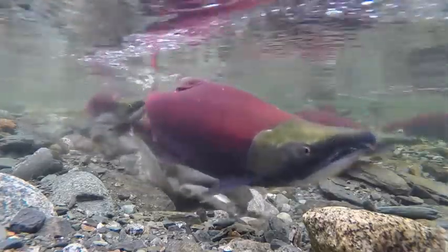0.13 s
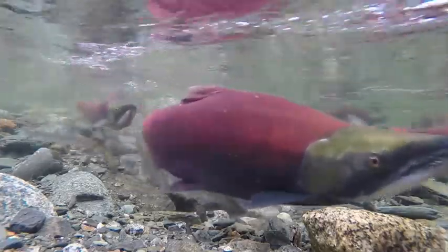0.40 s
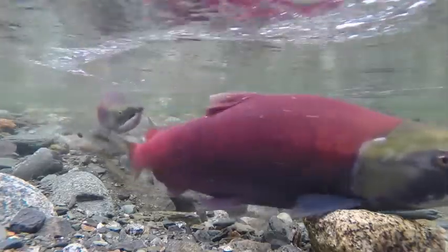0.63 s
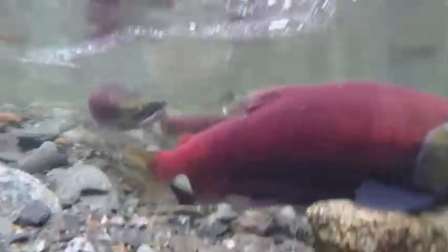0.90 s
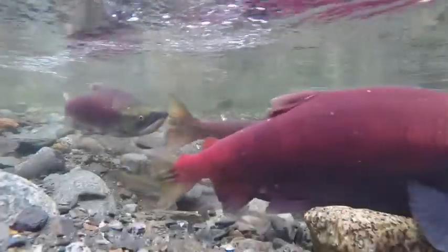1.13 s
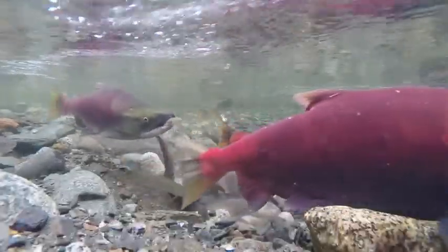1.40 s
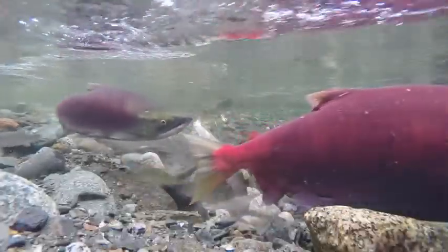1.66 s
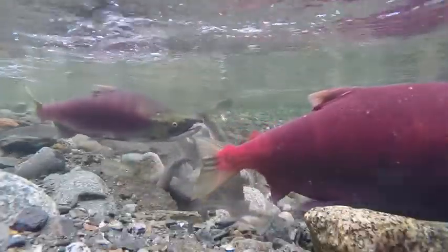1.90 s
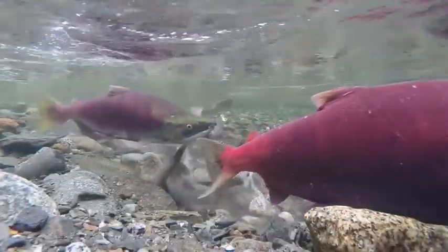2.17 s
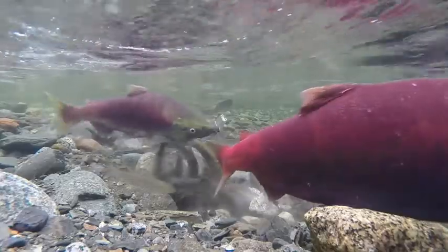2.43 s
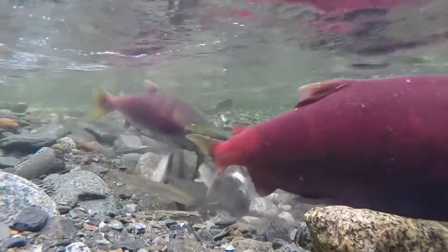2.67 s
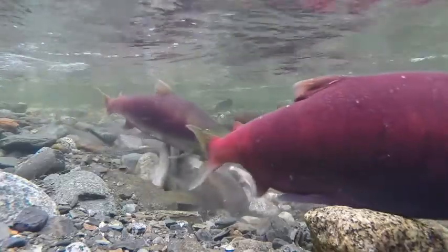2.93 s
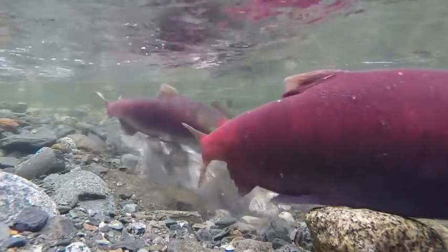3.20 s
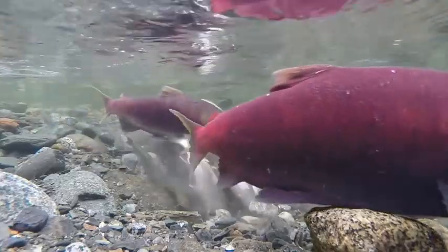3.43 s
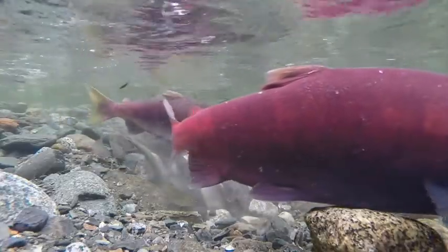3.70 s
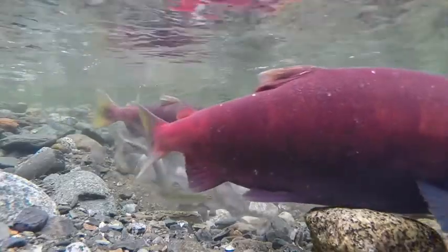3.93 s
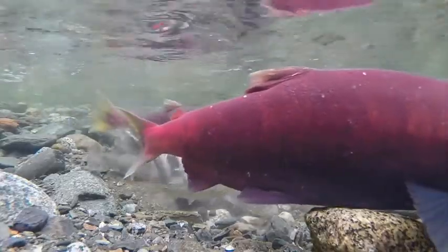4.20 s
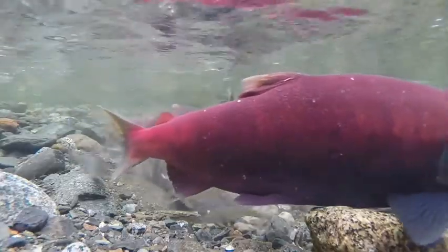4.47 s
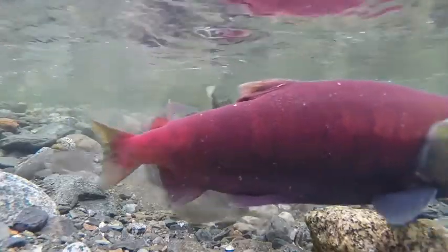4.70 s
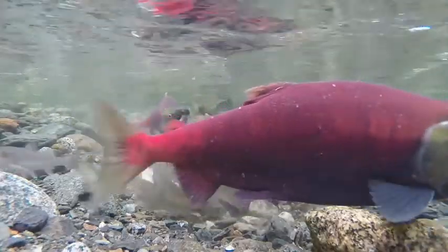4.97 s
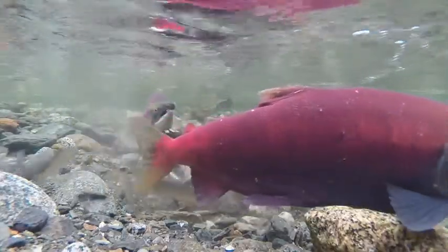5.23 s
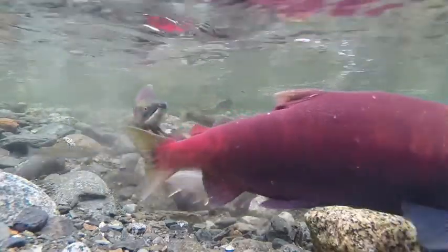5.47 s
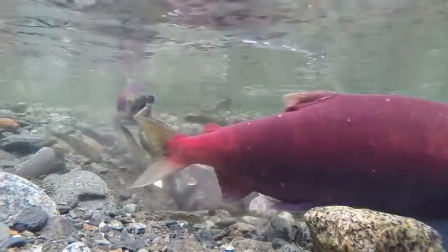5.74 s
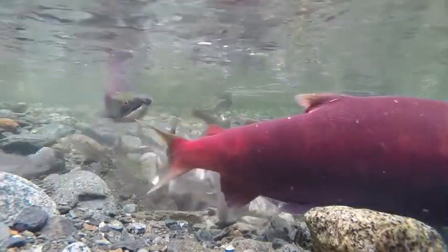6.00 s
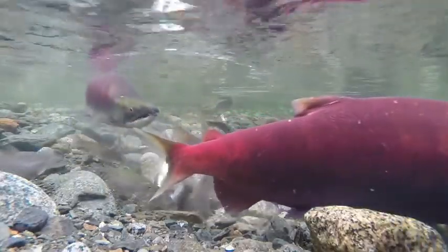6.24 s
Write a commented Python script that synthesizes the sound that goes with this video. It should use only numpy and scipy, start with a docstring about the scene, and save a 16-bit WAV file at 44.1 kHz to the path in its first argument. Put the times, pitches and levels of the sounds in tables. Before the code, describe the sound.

Faint underwater stream rumble and hiss, then a violent cluster of fish thumps with bubbles, followed by a rattle of gravel ticks and quiet.

```python
"""Low surges of water and a hiss, heard from inside a small sealed housing in a shallow gravel stream.
The surges are short swelling tones over a low rumble; the hiss is shaped noise, with a thin whistle in it.
Gravel ticks are noise knocks that make the shell ring. Then a fish knocks: pushes rock the housing, rough
noise hums in its body and hisses as spray, and bubbles are sliding tones that die away.
The gain control turns the sound down on the loud blows and brings it back slowly."""
import sys
import numpy as np
from scipy import signal
from scipy.fft import rfft, irfft
from scipy.io import wavfile
from scipy.ndimage import uniform_filter1d

SR = 44100
rng = np.random.default_rng(int(sys.argv[2]) if len(sys.argv) > 2 else 0)


def attenuation_scalar(level_db):
    """Turn a level in dB into a linear amplitude multiplier (20 dB per decade)."""
    decades = np.asarray(level_db, float) / 20
    return 10 ** decades


def generate_wav(signal):
    """Clip the signal to [-1, 1] and save it as 16-bit WAV at the path in sys.argv[1]."""
    frames = np.transpose(np.atleast_2d(signal))
    scaled = np.clip(frames, -1, 1) * 32767
    pcm = np.round(scaled).astype(np.int16)
    wavfile.write(sys.argv[1], SR, pcm)


N = 280917  # samples

# The strongest eddies that rock the housing: middle_s, peak_db, pitch_hz, half_length_ms
SURGES = [(.089, -38, 68.6, 17), (.126, -45.5, 62, 120), (.35, -42.5, 38, 13), (1.03, -30.5, 38, 48),
          (1.124, -40, 35.3, 27), (1.348, -44, 60, 13), (1.512, -40.5, 59, 6), (1.897, -39, 59, 18),
          (1.991, -35, 62.6, 17), (2.21, -43, 68.6, 13), (2.301, -42.5, 62.4, 60), (2.453, -37.5, 78.5, 11),
          (2.553, -45, 76, 13), (2.643, -33.5, 69.5, 12), (2.936, -44.5, 64, 28), (3.051, -42.5, 75, 14),
          (3.209, -41, 62, 15), (3.256, -41.5, 63.4, 9.7), (3.428, -34, 55, 18), (3.566, -42, 61, 32),
          (3.658, -44, 57.7, 28), (3.771, -40.5, 55.6, 13), (4.378, -48, 65, 15), (4.529, -39.5, 62, 17),
          (4.826, -44.5, 68.5, 10), (5.153, -44.5, 67, 18), (5.415, -39.5, 63.6, 11), (5.576, -43, 71, 34),
          (5.726, -43, 69, 12), (5.869, -41.5, 62, 57), (6.093, -41, 71, 17), (6.347, -43, 80, 19)]
# The unbroken rumble under the eddies: time_s, level_db
RUMBLE = [(0, -55), (.25, -53), (.46, -69), (.58, -50), (.95, -40), (1.06, -53.5), (1.58, -57.5),
          (2.04, -51), (2.77, -59.5), (3.62, -54.5), (3.94, -61), (4.58, -58), (5.46, -54.5), (6.37, -56)]
RUMBLE_HZ, RUMBLE_WIDTH_HZ = 62, 45
# Small eddies in between: how many per second, peak above the rumble
EDDIES_PER_S, EDDY_ABOVE_DB = 7, 9.5
# Their middle pitch, its spread either way as a share, and their average half-length
EDDY_HZ, EDDY_SPREAD, EDDY_MS = 65.4, .12, 12.4

# Colour of the stream's hiss: pitch_hz, relative_level_db (per Hz)
HISS_COLOUR = [(59, -12), (100, -6), (140, -4.5), (627, -11.5), (936, -15.5), (2630, -19.5), (3930, -23.5),
               (4960, -24), (6120, -28.5), (7250, -29.5), (9150, -34.5), (10400, -33.5), (14500, -42.5),
               (15500, -33)]
HISS_DB = -59.5
# A thin steady whistle: pitch_hz, width_hz, level_db
WHISTLE = (5050, 100, -78.5)

# The clearest gravel ticks: start_s, level_db, low_modes_db, top_modes_db, chatter_ms
TICKS = [(.2144, -59, -8.5, -30, 1.9), (.4157, -51, -6, 16, 1.7), (.426, -48, -1, 30, .77),
         (1.797, -54, 11, -8, 2.6), (1.8481, -48.5, 2, 0, 1.2), (1.8874, -49, 6, 13, 3.4),
         (1.9007, -46.5, -13, 12, 4.1), (1.925, -45, -17, 2, 1.4), (2.0331, -44.5, -12, -20, 0.6),
         (2.0507, -43.5, 10, -9, 0.57), (2.0705, -46, 7, -22, 2.1), (2.1017, -35.5, -0.5, -2, 2.3),
         (2.125, -46, 11, -20, .48), (2.1358, -44, -1, -5.5, 1.2), (2.1579, -38.5, -11, -9, 0.97),
         (2.1716, -35.5, 2.5, -1, 2), (2.178, -43, -17, -11, 3), (2.1962, -39, -1, -14, 2.7),
         (2.2124, -49, 1, -8, 2.8), (2.2381, -41.5, 1, -2, 1.3), (2.258, -45, 10, -2, 1),
         (2.2651, -46, 7.5, 10, 2.2), (2.2747, -45, -6, -19, 1.2), (2.3186, -39, 4, 8, 2.8),
         (2.3292, -44.5, 10, 2, 4), (2.3404, -38.5, -10, -14, 3.3), (2.3715, -44, 5, 0.5, 2.5),
         (2.4338, -40.5, -15, 2, .45), (2.468, -47.5, -3, 0, 1.1), (2.506, -51, 2, -9, 1.7),
         (2.5141, -44.5, 6, -15, .37), (2.5466, -47.5, -2, 17, 1.1), (2.6394, -42.5, -3, -13, 1.1),
         (2.7333, -55.5, -9, 20, .84), (2.868, -51.5, 6, 15, 0.72), (3.0781, -52, -8, -7, 2.1),
         (3.112, -50, -1, 3, 1.1), (3.156, -55, -6, 11, 2.2), (3.3689, -53, 18, -10, 1.6),
         (4.2363, -56.5, -13, 5, 3.2), (4.3674, -47, -8, 12, 1.9), (4.82, -47.5, 4, -13, 0.52),
         (4.897, -51.5, 14, -23, 0.4), (4.9052, -49, 8, -20, 0.64), (4.959, -55.5, 23, -19, 2),
         (5.17, -56, 17, -19, 1.6), (5.4437, -48.5, 13, -9, 0.48), (5.6803, -40.5, -29, -6, 1.1),
         (5.7957, -52, 0, -16, 0.75), (6.0814, -43.5, -14, 8, 1.04)]
# Weaker stones, which fall where the grit is thick; the spreads are standard deviations
PEBBLE_COUNT, PEBBLE_DB, PEBBLE_MS = 44, -57, 2.6
PEBBLE_SPREAD_DB, PEBBLE_COLOUR_DB = 3.5, 10.5
# Small gravel in between: time_s, level_db
GRIT = [(0, -100), (1.6, -114), (1.9, -90), (2.02, -93), (2.2, -85), (2.36, -84), (2.45, -91), (2.9, -100),
        (3.2, -125), (4.9, -117), (6.37, -121)]
GRIT_PER_S = 320
# Stray grains that arrive all the time: how many per second, middle level
STRAYS_PER_S, STRAY_DB = 9, -71
# Tones at which the shell rings: pitch_hz, level_db, fall_by_60_db_s
SHELL = [(1513, -4.5, 0.054), (1975, -2, 0.0062), (2485, 6, 0.014), (3480, -6, 0.0068), (4630, 11, 0.0045),
         (4740, -1.5, 0.0069), (5080, 7.5, 0.0061), (6270, -0.5, 0.0048), (7330, 11.5, 0.0059),
         (8800, -10, 0.007), (9970, 9, 0.0026), (11490, 10.5, 0.0028), (12920, -25, 0.0093)]

# Bubbles: start_s, peak_db, first_pitch_hz, last_pitch_hz, fall_by_60_db_s
BUBBLES = [(.614, -45.5, 2750, 2900, .027), (.643, -52, 2620, 2620, .065), (.644, -43, 5900, 5600, 0.014),
           (.674, -39.5, 2100, 2040, .04), (.698, -34, 2340, 2200, .11), (.701, -37, 5400, 5500, 0.013),
           (.7055, -22.5, 2010, 1860, 0.055), (.721, -10, 386, 420, .089), (.735, -8.5, 432, 440, .16),
           (.739, -14, 1390, 1430, 0.051), (.758, -12.5, 640, 700, 0.093), (.7775, -31, 5150, 5100, .019),
           (.787, -25, 1480, 1500, 0.044), (.797, -15, 686, 730, .098), (.805, -12, 430, 395, 0.094),
           (.805, -13.5, 2310, 2180, 0.039), (.805, -19, 3400, 3400, 0.014), (.828, -1.5, 112, 136, .11),
           (.85, -14.5, 440, 555, 0.17), (.899, -4.5, 285, 274, 0.057), (.9, -13.5, 766, 820, 0.034),
           (.9035, -23, 2920, 3100, .022), (.924, -6.5, 127, 101, 0.17), (.926, -25.5, 2880, 2830, .016),
           (.94, -23.5, 258, 301, 0.17), (.947, -26, 510, 530, 0.072), (1.065, -41.5, 700, 520, 0.046),
           (1.0755, -31, 7140, 7500, .0078), (1.08, -45, 1750, 1840, 0.1), (1.09, -41.5, 576, 740, .068),
           (1.121, -46, 2374, 2370, .042), (1.146, -30.5, 1880, 1750, 0.027),
           (1.163, -33.5, 1485, 1460, .076), (1.185, -31.5, 781, 840, 0.09),
           (1.185, -49.5, 1730, 1770, 0.12), (1.2, -43, 700, 830, 0.12), (1.216, -43, 8040, 8000, 0.0094),
           (1.232, -46, 2290, 2290, .034), (1.233, -49, 595, 494, 0.25), (1.266, -39.5, 1670, 1620, 0.031),
           (1.319, -34.5, 557, 833, 0.2), (1.32, -35, 800, 856, 0.22), (1.324, -42.5, 2450, 2380, .031)]
# Tiny bubbles left in the wake: first_s, last_s, lowest_pitch_hz, highest_pitch_hz, loudest_db
WAKE = (1.055, 1.29, 450, 2600, -45.5)

# Blows of the fish: start_s, level_db, push_ms, stiffness (pitch factor), direction (1 or -1)
BLOWS = [(.718, 9.5, 2.9, .93, -1), (.7204, 5.1, 2.8, 1.1, -1), (.7307, 13.6, 13, .95, 1),
         (.7929, 2.2, 3.8, 1.11, 1), (.8059, -2.1, 2.9, .8, -1), (.8397, -1.8, 2.3, 1.49, -1),
         (.8577, -5, 2.4, 1.18, 1), (.8979, 7.9, 13, 1.37, 1), (.9037, 9.7, 12.8, 1.1, -1),
         (.9211, 3.1, 7.5, 1.11, 1)]
# Tones at which the housing rocks on its seat: pitch_hz, level_db, fall_by_60_db_s
ROCK = [(49.5, -11, .286), (65.5, 0, .305), (105.6, -16.9, .267), (203, -12.2, .056)]
# Rough water forced along the housing: time_s, level_db
CHURN = [(.6, -74), (.716, -42.5), (.722, -2.5), (.74, -16.5), (.855, -28), (.89, -30), (.903, -16),
         (.918, -33), (1.0, -65), (1.08, -52.5), (1.4, -74)]
# Tones at which the body of the housing hums: pitch_hz, width_hz, level_db
BODY = [(178, 21, 8.5), (285, 30, 10), (448, 66, 12.5), (520, 40, -15), (700, 190, 12), (884, 73, -33),
        (1478, 46, 0)]
# Splashes of spray on the shell: start_s, length_ms, low_level_db, bright_level_db
SPLASHES = [(.676, 2.7, -43, -64), (.719, 29, -23.5, -34.5), (.73, 8.9, -10.5, -50), (.765, 6, -29, -46),
            (.81, 12, -31, -43), (.824, 9.9, -26, -33.5), (.832, 22, -25.5, -42), (0.901, 4.2, -19, -47),
            (.911, 2.6, -23, -33), (0.945, 3, -42, -73), (1.06, 68, -54, -72), (1.148, 2.8, -52, -70)]

# The gain control takes away this share of the decibels by which the held peak passes the limit
DUCK_ABOVE_DB, DUCK_SHARE = -10, .6
PEAK_FALL_DB_PER_S = 25.5  # how fast the held peak is let go
TOP_HZ = 14500  # the converter cuts the treble above this


def filt(x, lo_hz, hi_hz, order=2):
    """Keep only the sound between two pitches."""
    sos = signal.butter(order, [lo_hz, min(hi_hz, .45 * SR)], "band", fs=SR, output="sos")
    return signal.sosfilt(sos, x)


def noise(db=0):
    """White noise: all pitches equally strong."""
    return attenuation_scalar(db) * rng.standard_normal(N)


def unit(x):
    """Scale to an average (rms) level of 1."""
    return x / np.sqrt(np.mean(x ** 2))


def curve(rows):
    """Join the points of a table by straight lines in time; one curve for each column after the first."""
    s, *cols = np.transpose(rows)
    return [np.interp(np.arange(N) / SR, s, c) for c in cols]


def ring(hz, t60, last_hz=None):
    """A dying tone; its pitch may slide to another within the first third of its life."""
    t = np.arange(int(t60 * SR)) / SR
    pitch = np.interp(t, [0, t60 / 3], [hz, last_hz or hz])
    return np.sin(2 * np.pi * np.cumsum(pitch) / SR) * 1000 ** (-t / t60)


def add(out, s, grain):
    """Mix a short sound in at time s."""
    i = max(int(s * SR), 0)
    out[i:i + len(grain)] += grain[:N - i]


def walk(rate):
    """A random wandering line with a new target rate times per second; its spread is near 1."""
    k = int(SR / rate)
    steps = np.repeat(rng.standard_normal(N // k + 1), k)
    return 1.17 * uniform_filter1d(steps, k)[:N]


def current():
    """Each eddy swells and fades within a few swings; small random ones merge into a noise rumble."""
    out = np.zeros(N)
    rumble_db = curve(RUMBLE)[0]
    small = []
    for a, b, c in rng.random((EDDIES_PER_S * N // SR, 3)):
        peak_db = rumble_db[int(a * N)] + EDDY_ABOVE_DB
        hz = EDDY_HZ * (1 + EDDY_SPREAD * (2 * b - 1))
        small.append((a * N / SR, peak_db, hz, EDDY_MS * (.5 + c)))
    eddies = SURGES + small
    t = np.arange(-.15, .15, 1 / SR)
    for (s, db, hz, ms), turn in zip(eddies, rng.random((len(eddies), 1))):
        swell = np.exp(-(1000 * t / ms) ** 2)
        add(out, s + t[0], attenuation_scalar(db) * swell * np.sin(2 * np.pi * (hz * t + turn)))
    half = RUMBLE_WIDTH_HZ / 2
    rumble = unit(filt(noise(), RUMBLE_HZ - half, RUMBLE_HZ + half))
    return out + rumble * attenuation_scalar(rumble_db)


def hiss():
    """Smooth noise from the stream, in half-octave bands that each flicker a little."""
    f = np.maximum(np.fft.rfftfreq(N, 1 / SR), 1)
    hz, db = np.transpose(HISS_COLOUR)
    spectrum = rfft(noise()) * attenuation_scalar(np.interp(np.log(f), np.log(hz), db))
    place = np.log2(f / 100) * 2  # in half octaves from 100 Hz
    out = np.zeros(N)
    for k in range(-2, 16):
        share = np.clip(1 - abs(place - k), 0, 1)  # neighbouring bands overlap
        out += irfft(spectrum * share, N) * attenuation_scalar(1.1 * walk(16))
    return unit(out) * attenuation_scalar(HISS_DB)


def whistle():
    """Noise squeezed into one narrow band is heard as a breathy tone."""
    hz, width, db = WHISTLE
    return attenuation_scalar(db) * unit(filt(noise(), hz - width / 2, hz + width / 2, order=1))


def shell(db, low_db, top_db, z):
    """One strike on the shell: where it lands decides which tones speak, each a little off pitch."""
    out = np.zeros(SR // 10)
    for (hz, mode_db, t60), a, b in zip(SHELL, *z):
        group_db = low_db if hz < 3200 else top_db if hz > 8500 else 0
        add(out, 0, attenuation_scalar(db + mode_db + group_db + 3 * a) * ring(hz * (1 + .03 * b), t60))
    return out


def gravel():
    """A stone strikes and chatters on the ringing shell; weaker stones and fine grit tick at random."""
    out = np.zeros(N)
    grit_gain = attenuation_scalar(curve(GRIT)[0])
    t = np.arange(SR // 40) / SR
    # thick grit makes a weak stone more likely
    chance = np.cumsum(grit_gain) / grit_gain.sum()
    when = np.searchsorted(chance, rng.random(PEBBLE_COUNT)) / SR
    weak = []
    for s, (a, b, c) in zip(when, rng.standard_normal((PEBBLE_COUNT, 3))):
        level_db = PEBBLE_DB + PEBBLE_SPREAD_DB * a
        weak.append((s, level_db, PEBBLE_COLOUR_DB * b, PEBBLE_COLOUR_DB * c, PEBBLE_MS))
    stones = TICKS + weak
    for (s, db, low_db, top_db, ms), z in zip(stones, rng.standard_normal((len(stones), len(t)))):
        knock = z * np.exp(-t * 1000 / max(ms, .2)) * np.minimum(t / 0.00044, 1)
        tick = np.convolve(knock, shell(0, low_db, top_db, z[-26:].reshape(2, 13)))
        loudest = np.sqrt(uniform_filter1d(tick ** 2, size=44).max() / 2)  # over about 1 ms
        add(out, s, attenuation_scalar(db) * tick / loudest)
    hits = rng.random(N) < GRIT_PER_S / SR
    sizes = hits * attenuation_scalar(1.8 * rng.exponential(size=N)) * np.sign(noise())
    stray_hits = rng.random(N) < STRAYS_PER_S / SR
    strays = stray_hits * attenuation_scalar(STRAY_DB + 6 * (rng.random(N) - .5))
    strike = shell(0, 1.8, -0.5, np.zeros((2, 13)))
    grit = signal.fftconvolve(unit(sizes) * grit_gain + strays, strike)[:N]
    # the stiff shell passes no bass from small stones
    return filt(out + grit, 1430, 10440, order=3)


def bubbles():
    """Each bubble starts softly, slides in pitch and dies as it drifts off; tiny ones follow the fish."""
    first, last, lo_hz, hi_hz, wake_db = WAKE
    swarm = []
    for a, b, c, d in rng.random((80, 4)):
        hz = lo_hz * (hi_hz / lo_hz) ** c
        swarm.append((first + a * (last - first), wake_db - 10 * b, hz, None, .015 + .035 * d))
    out = np.zeros(N)
    waver_db = 3.2 * walk(150)
    for s, db, hz, last_hz, t60 in BUBBLES + swarm:
        tone = ring(hz, t60, last_hz)
        life = np.arange(len(tone)) / len(tone)  # 0 to 1
        tone = tone * attenuation_scalar(waver_db[int(s * SR):][:len(tone)])
        soft_start = np.minimum(life * t60 / .0018, 1)
        drift_off = np.interp(life, [.25, .5], [1, 0])
        add(out, s, attenuation_scalar(db) * tone * soft_start * drift_off)
    return out


def fish():
    """Blows rock the housing; rough water rubbing past makes its body hum; spray hisses."""
    out = np.zeros(N)
    for s, db, ms, stiff, way in BLOWS:
        push = np.hanning(int(ms * SR / 1000))
        for hz, mode_db, t60 in ROCK:
            # a stiffer contact rocks faster and stops sooner
            rocking = np.convolve(ring(hz * stiff, t60 / stiff), push / push.sum())
            add(out, s, way * attenuation_scalar(db + mode_db) * rocking)
    rough = noise() * attenuation_scalar(4.7 * walk(250) + 2.9 * walk(60))
    body = np.zeros(N)
    for hz, width, db in BODY:
        body += attenuation_scalar(db) * unit(filt(rough, hz - width / 2, hz + width / 2, order=1))
    out += unit(filt(body, 80, 2260, order=3)) * attenuation_scalar(curve(CHURN)[0])
    low = unit(filt(rough, 540, 2580, order=3))
    bright = unit(filt(rough, 4600, 8900))
    for s, ms, low_db, bright_db in SPLASHES:
        shape = signal.windows.tukey(int(ms * SR / 1000), .5)
        here = slice(int(s * SR), int(s * SR) + len(shape))
        add(out, s, shape * (attenuation_scalar(low_db) * low[here] + attenuation_scalar(bright_db) * bright[here]))
    return out


def scene():
    """All sources added up at one microphone."""
    return (current() + hiss() + whistle() + gravel() + bubbles() + fish())[None]


def band_limit(x):
    """A steep low-pass at the top of the band."""
    return signal.sosfilt(signal.butter(12, 15690, fs=SR, output="sos"), x)


def record(dry):
    """Gain control drops at once on a loud blow and recovers steadily; the converter clips and cuts the top."""
    fall_db = PEAK_FALL_DB_PER_S * np.arange(N) / SR
    level_db = 20 * np.log10(np.abs(dry[0]) + 1e-9)
    # the highest peak so far, let go at a steady rate
    held_db = np.maximum.accumulate(level_db + fall_db) - fall_db
    duck_db = DUCK_SHARE * np.maximum(held_db - DUCK_ABOVE_DB, 0)
    duck_db = uniform_filter1d(duck_db, size=90)  # smoothed over about 2 ms
    clipped = np.clip(dry * attenuation_scalar(-duck_db), -1, 1)
    top = signal.butter(8, TOP_HZ, fs=SR, output="sos")
    return band_limit(signal.sosfilt(top, clipped))


dry = scene()
out = record(dry)
generate_wav(out)
```